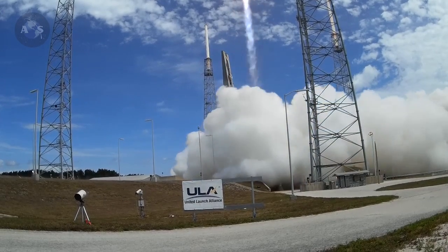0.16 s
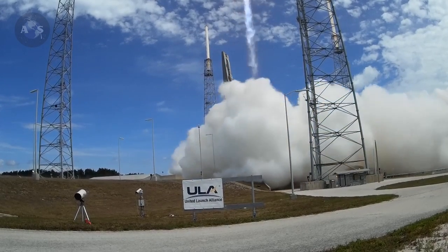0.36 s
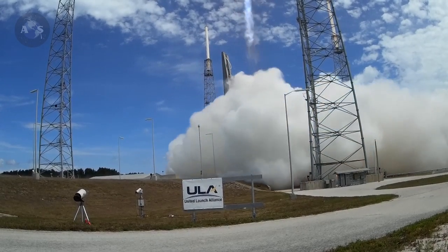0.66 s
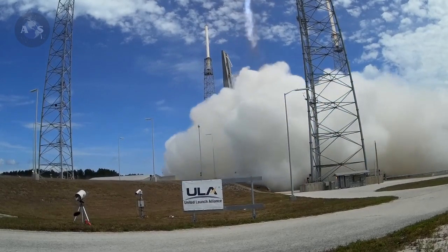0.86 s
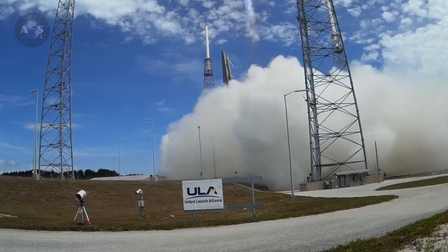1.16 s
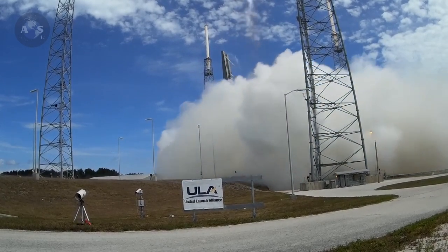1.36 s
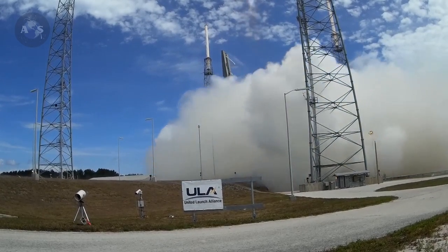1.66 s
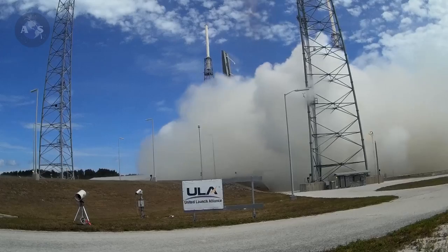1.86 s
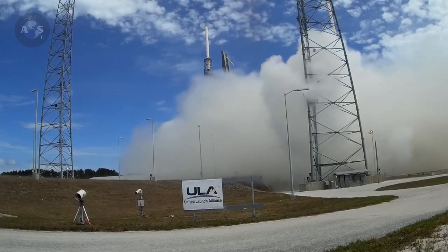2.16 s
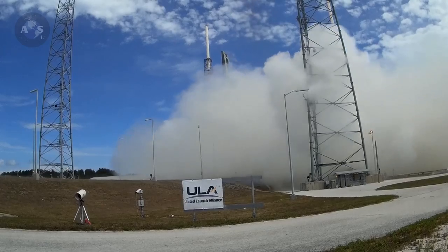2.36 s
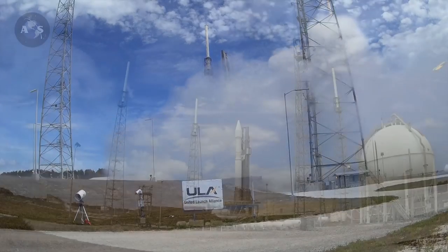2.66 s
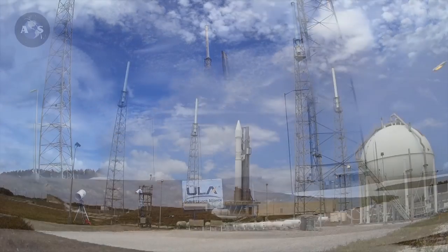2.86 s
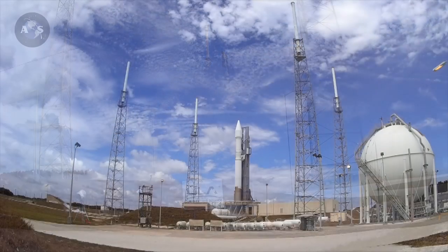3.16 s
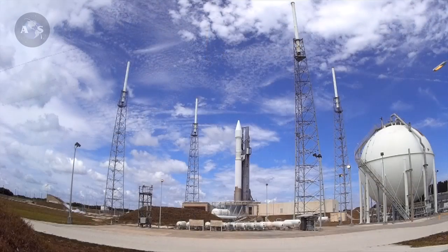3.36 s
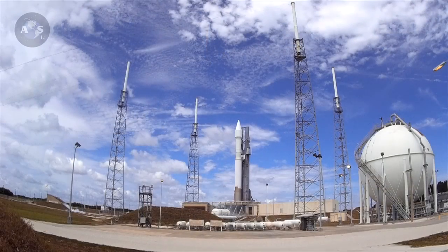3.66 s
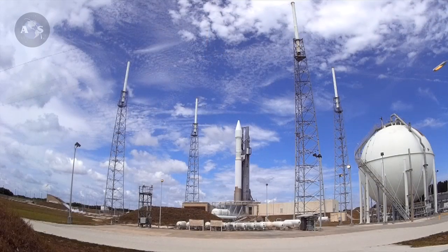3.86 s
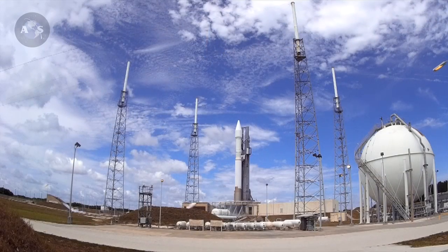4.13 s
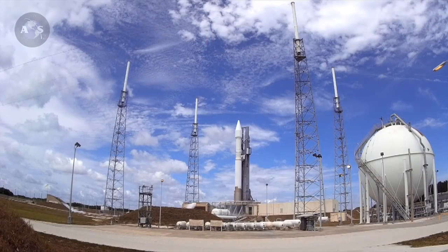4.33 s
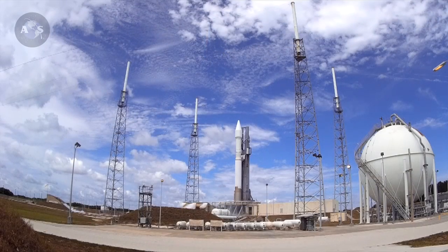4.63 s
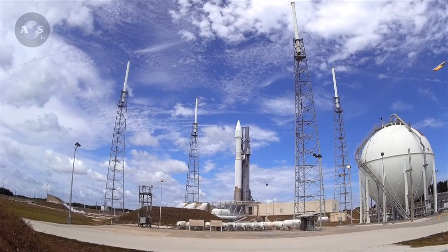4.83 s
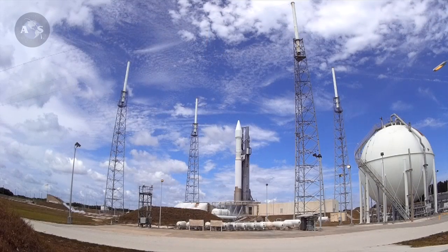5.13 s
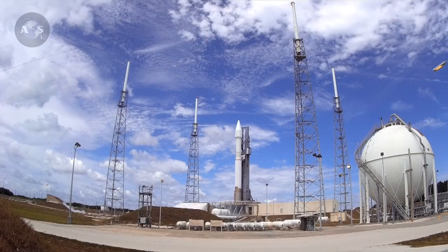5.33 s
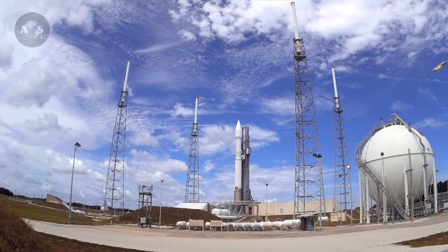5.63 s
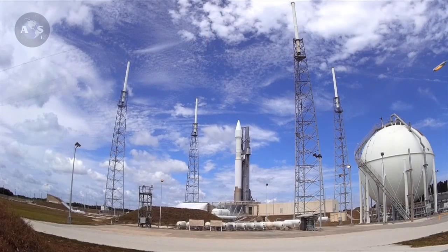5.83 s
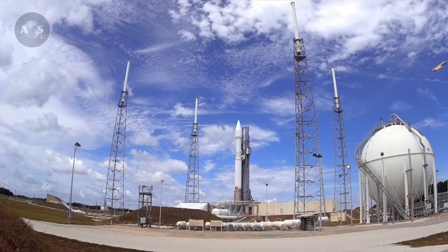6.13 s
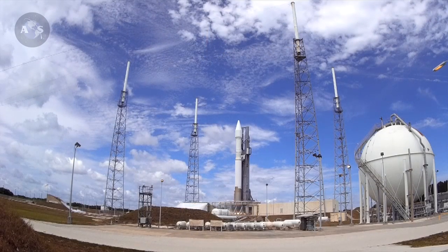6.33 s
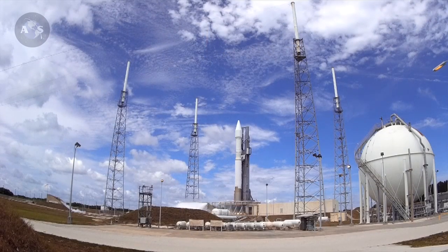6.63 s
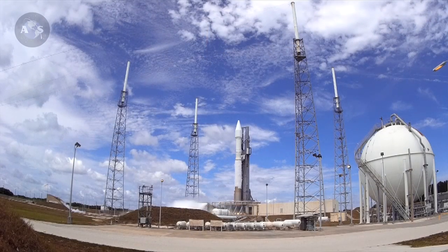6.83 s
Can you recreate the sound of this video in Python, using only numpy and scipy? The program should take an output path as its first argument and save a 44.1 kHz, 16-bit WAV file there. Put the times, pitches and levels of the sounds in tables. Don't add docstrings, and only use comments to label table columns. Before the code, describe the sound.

A hugely overloaded, crackling rocket roar cuts abruptly to a quiet pad, where water spray and igniter hiss build into booming engine ignition.

```python
import sys
import numpy as np
from scipy import signal
from scipy.io import wavfile
from scipy.ndimage import uniform_filter1d

SR = 44100
rng = np.random.default_rng(int(sys.argv[2]) if len(sys.argv) > 2 else 0)


def inscribe(sig):
    pcm = np.round(np.clip(np.atleast_2d(sig).T, -1, 1) * 32767)
    wavfile.write(sys.argv[1], SR, pcm.astype(np.int16))


def gain_from_db(level_db):
    decades = np.asarray(level_db, float) / 20
    return 10 ** decades


N = 308252
T = np.arange(N) / SR
CUT_S = 2.9442

# time_s, level_db
RUMBLE_LEVEL = [(3.0, -50), (3.6, -46), (4.0, -40), (4.44, -42.5), (4.56, -37.5), (5.4, -32.5), (5.7, -28),
                (6.5, -26.5), (6.99, -9.5)]
# freq_hz, density_db_per_hz
DEEP_SPECTRUM = [(12, -7), (30, -4.5), (70, 2), (110, 1.5), (135, -13)]
# freq_hz, density_db_per_hz
UPPER_SPECTRUM = [(90, -50), (115, -0.5), (200, 0), (300, -7), (400, -27), (520, -18.5)]
UPPER_DB = -3
UPPER_SPRAY_SHARE, UPPER_SPRAY_DB = 0.59, -31

# time_s, level_db, brightness_db
HISS_LEVEL = [(3.0, -39, -1), (3.46, -36.5, -4), (3.55, -31.5, -2), (3.66, -24, -5), (3.8, -22.5, -8.5),
              (4.33, -30.5, -3), (4.6, -27, -5), (5.05, -29, -2.5), (5.37, -25, -5.5), (5.43, -23.5, 3.5),
              (5.5, -17, 1), (5.9, -20, -1), (6.46, -21, -4), (6.56, -16, -7.5), (6.62, -24, -10),
              (6.74, -22.5, -10), (6.9, -12.5, -9), (6.99, -11, -13)]
# freq_hz, density_db_per_hz
SPRAY_SPECTRUM = [(200, -11), (400, -7), (700, -2.5), (1000, 0.5), (1600, -7), (2600, -9), (3300, -7.5),
                  (4200, -16.5), (5800, -9.5), (7500, -23), (10000, -25.5), (11500, -39.5), (14000, -60),
                  (16000, -70)]
# freq_hz, density_db_per_hz
IDLE_SPECTRUM = [(150, -16), (480, -13), (650, -6), (930, 0.5), (1250, -8.5), (1500, -14), (1650, -12),
                 (2050, -25.5), (2500, -15), (3200, -12), (4200, -20), (4800, -28), (5800, -15.5),
                 (6700, -33)]
IDLE_UNTIL_S, IDLE_AIR_DB = 3.52, -4
# freq_hz, width_hz, gain_db
HOUSING_NOTCHES = [(400, 82, -7.5), (2050, 268, -13.5), (4750, 460, -5.5), (6650, 480, -12.5),
                   (8740, 400, -5.5)]
# freq_hz, width_hz, gain_db
HOUSING_RIDGES = [(1048, 34, 3.5), (2160, 50, 6.5), (2710, 48, 4), (3220, 46, 2.5), (4230, 67, 5)]
AIR_FOLLOW, AIR_DB = 1.03, -14
STEAM_S, STEAM_GROW_S, STEAM_DB = 5.26, 0.39, -5.5
STEAM_CLEARS_S, STEAM_CLEARING_S = 6.87, 0.062

# time_s, peak_db, pitch_hz, t60_s
PAD_KNOCKS = [
    (4.493, -10.5, 1050, .03),
    (4.5195, -14, 1110, .03),
]
# time_s, peak_db, pitch_hz, t60_s
GUST_THUMPS = [
    (3.12, -31, 105, .08),
    (3.29, -31, 194, .07),
    (3.365, -24, 170, .03),
    (4.505, -16, 200, .05),
    (4.836, -19, 67, .1),
    (4.86, -13, 260, .03),
    (4.959, -13, 130, .035),
    (5.175, -11, 190, .03),
    (5.94, -20, 75, .1),
]
# time_s, peak_db
IGNITER_CRACKS = [(5.4283, -47), (5.4852, -39), (5.4897, -29), (5.5156, -33), (5.5326, -33), (5.559, -32),
                  (5.6099, -34), (5.6353, -38), (5.6688, -36), (5.6977, -37), (5.7142, -35), (5.7421, -37),
                  (5.766, -34), (5.8259, -38), (5.9571, -36), (6.1138, -41), (6.1721, -43), (6.4445, -43),
                  (6.5503, -42), (6.5737, -38), (6.8356, -40), (6.8511, -32), (6.882, -39), (6.8925, -33),
                  (6.905, -36), (6.9159, -32), (6.9409, -29), (6.9658, -25)]
CRACK_HZ, CRACK_T60_S, CRACK_DB = 13500, 0.002, 6

# start_s, rate_per_s, lasting_share, thinning_s, size_db
EXHAUST_SHOCKS = [
    (5.46, 42, .1, .25, -18),
    (6.81, 170, .7, .04, -2),
]

# centre_s, half_length_s, peak_db, pitch_hz
DUCT_HEAVE = [
    (6.68, .06, -25, 39.7),
    (6.94, 0.071, -11, 28.1),
]
# centre_s, half_length_s, peak_db, pitch_hz
DUCT_LOW = [
    (6.6, .03, -11, 86),
    (6.652, 0.021, -9.5, 83.85),
    (6.703, 0.027, -3.5, 86.05),
    (6.785, 0.022, -14, 77),
    (6.868, .018, -1.5, 81.35),
    (6.985, .04, -2.5, 108.2),
]
# centre_s, half_length_s, peak_db, pitch_hz
DUCT_HIGH = [
    (6.445, 0.037, -17, 234.5),
    (6.565, 0.043, -20, 255.6),
    (6.7, 0.022, -24, 279.2),
    (6.835, 0.044, -16, 194.6),
    (6.9, 0.028, -1.5, 177.5),
    (6.96, .045, -7, 161.8),
]
BOOM_EDGE_DB = -12

# freq_hz, density_db_per_hz
JET_SPECTRUM = [(15, -6), (60, 2), (150, 2), (300, -4), (400, -1.5), (530, 0.5), (800, -3.5), (1200, -3.5),
                (1650, -4.5), (1900, -10), (2500, -15.5), (4000, -21.5), (8000, -29), (16000, -35.5)]
JET_DB, JET_BIAS = 8, -0.15

RAILS_A = (-.26, 0.27)
RAILS_B = (-.45, .45)
GRIT_A_DB, GRIT_B_DB = -14, -66
SELF_NOISE_DB = -76


def evened(x):
    return x / np.sqrt(np.mean(abs(x) ** 2) + 1e-20)


def read(points, hz):
    f, value = np.transpose(points)
    return np.interp(np.log(hz + 1), np.log(f + 1), value, -120, -120)


def curve(rows, t, index):
    rows = np.array(rows)
    return np.interp(t, rows[:, 0], rows[:, index])


def noise(colour_db, size, patchy_db, flicker_db):
    hop = size // 4
    hz, frames = np.fft.rfftfreq(size, 1 / SR), N // hop + 5
    real, imag, patches = rng.standard_normal((frames, len(hz), 3)).T
    patches = uniform_filter1d(patches, size // 64, axis=0)
    patches = evened(uniform_filter1d(patches, size=12, axis=1))
    flicker = evened(uniform_filter1d(rng.standard_normal(frames), size=3))
    field_db = colour_db(hz[:, None], np.arange(frames) * hop / SR)
    field_db = field_db + patchy_db * patches + flicker_db * flicker
    spectra = (real + 1j * imag) * gain_from_db(field_db)
    return evened(signal.istft(spectra, nperseg=size, noverlap=size - hop)[1][:N])


def steady(spectrum):
    return lambda hz, t: read(spectrum, hz) + 0 * t


def rumble():
    deep = noise(steady(DEEP_SPECTRUM), size=4096, patchy_db=0.5, flicker_db=0.2)
    upper = noise(steady(UPPER_SPECTRUM), size=2048, patchy_db=1.0, flicker_db=1.5)
    level = gain_from_db(curve(RUMBLE_LEVEL, T, index=1))
    stirred = gain_from_db(UPPER_SPRAY_DB + UPPER_SPRAY_SHARE * curve(HISS_LEVEL, T, index=1))
    return level * deep + np.hypot(gain_from_db(UPPER_DB) * level, stirred) * upper


def hiss_colour_db(hz, t):
    housing = sum(db * np.exp(-((hz - f) / width) ** 2) for f, width, db in HOUSING_NOTCHES + HOUSING_RIDGES)
    bright = curve(HISS_LEVEL, t, index=2)
    steam_grown = np.clip((t - STEAM_S) / STEAM_GROW_S, 0, 1)
    steam_left = np.clip((STEAM_CLEARS_S - t) / STEAM_CLEARING_S, 0, 1)
    air = AIR_DB + AIR_FOLLOW * bright + STEAM_DB * steam_grown * steam_left
    air = air + IDLE_AIR_DB * (t < IDLE_UNTIL_S + 0.15)
    middle = np.clip((hz - 1250) / 900, 0, 1)
    top = np.clip((hz - 6500) / 500, 0, 1)
    spray = read(SPRAY_SPECTRUM, hz) + housing + (middle - top) * (bright + 2.9) + top * (air + 18)
    idle = np.clip((IDLE_UNTIL_S - t) / 0.085, 0, 1) * (1 - top)
    return idle * (read(IDLE_SPECTRUM, hz) + 3) + (1 - idle) * spray


def hiss():
    level = gain_from_db(curve(HISS_LEVEL, T, index=1) + 1.43)
    return level * noise(hiss_colour_db, size=1024, patchy_db=0.72, flicker_db=0.36)


def rings(rows, rise_s):
    out, t = np.zeros(N + 8000), np.arange(8000) / SR
    rise = 1 - np.exp(-t / rise_s)
    for start_s, db, hz, t60_s in rows:
        ring = gain_from_db(db - 60 * t / t60_s) * np.sin(2 * np.pi * hz * t) * rise
        out[round(start_s * SR):][:len(t)] += ring
    return out[:N]


def blows():
    crack_rows = [(s, db + CRACK_DB, CRACK_HZ, CRACK_T60_S) for s, db in IGNITER_CRACKS]
    cracks = rings(crack_rows, rise_s=0.0002)
    return rings(PAD_KNOCKS, rise_s=0.0007) + rings(GUST_THUMPS, rise_s=0.0015) + cracks


def shocks():
    draws, size = rng.random((len(EXHAUST_SHOCKS), N)), rng.exponential(1, N)
    fronts = np.zeros(N)
    for draw, (start_s, rate, lasting, thin_s, db) in zip(draws, EXHAUST_SHOCKS):
        rate_per_s = rate * (lasting + (1 - lasting) * np.exp(-abs(T - start_s) / thin_s))
        fronts += (T > start_s) * (draw < rate_per_s / SR) * gain_from_db(db)
    u = np.arange(600) / SR / 0.00035
    pulse = (1 - u) * np.exp(-u) * (1 - np.exp(-u / 0.2))
    return signal.oaconvolve(fronts * gain_from_db(0.82 * np.minimum(size, 3)), pulse)[:N]


def boom(rows, wander, lumps_db):
    drift, lumps = uniform_filter1d(rng.standard_normal((2, N)), size=500, axis=1)
    hz = curve(rows, T, index=3) * (1 + wander * evened(drift))
    swing = np.sqrt(2) * np.sin(2 * np.pi * np.cumsum(hz) / SR)
    lumps = evened(uniform_filter1d(lumps, size=300))
    swells = sum(gain_from_db(db + BOOM_EDGE_DB * ((T - s) / half_s) ** 2) for s, half_s, db, _ in rows)
    return swells * gain_from_db(lumps_db * lumps) * swing


def flame_duct():
    columns = boom(DUCT_LOW, wander=0.14, lumps_db=2.5) + boom(DUCT_HIGH, wander=0.09, lumps_db=2.5)
    return columns + boom(DUCT_HEAVE, wander=0.2085, lumps_db=3)


def jet():
    roar = noise(steady(JET_SPECTRUM), size=1024, patchy_db=1.3, flicker_db=0.5)
    return gain_from_db(JET_DB) * (roar + JET_BIAS)


def scene():
    ignition = rumble() + hiss() + blows() + shocks() + flame_duct()
    return np.where(T < CUT_S, jet(), ignition)[None]


def camera(x, rails, grit_db):
    z = signal.stft(np.clip(x, *rails), nperseg=1024)[2]
    grit = rng.standard_normal(z.shape) + 1j * rng.standard_normal(z.shape)
    z = z + gain_from_db(grit_db) * uniform_filter1d(abs(z), size=16, axis=0) * grit
    return signal.istft(z, nperseg=1024)[1][:N]


def roll_off(x):
    return signal.sosfilt(signal.butter(12, 14980, fs=SR, output="sos"), x)


def record(dry):
    first = T < CUT_S
    a = camera(dry[0] * first, RAILS_A, GRIT_A_DB)
    self_noise = gain_from_db(SELF_NOISE_DB) * rng.standard_normal(N)
    b = camera(dry[0] * ~first + self_noise, RAILS_B, GRIT_B_DB)
    band_limit = signal.firwin(121, 14450, window=("kaiser", 7), fs=SR)
    joined = signal.oaconvolve(np.where(first, a, b), band_limit, "same")
    return roll_off(joined[None])


dry = scene()
out = record(dry)
inscribe(out)
```